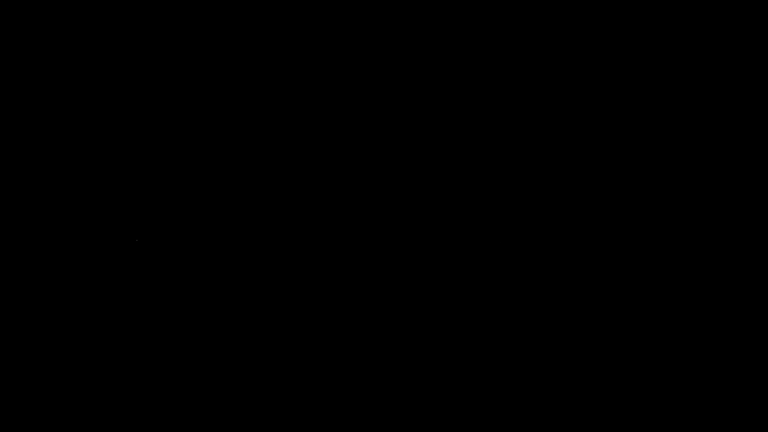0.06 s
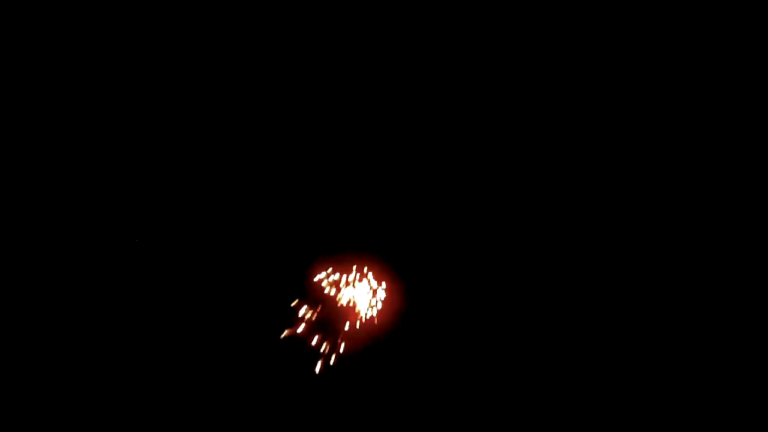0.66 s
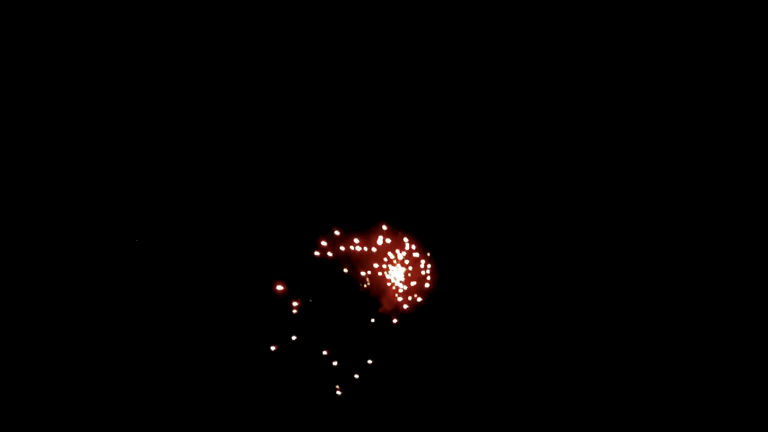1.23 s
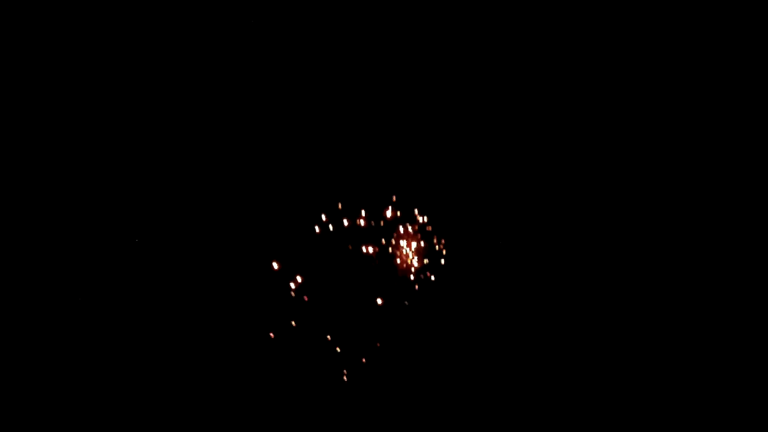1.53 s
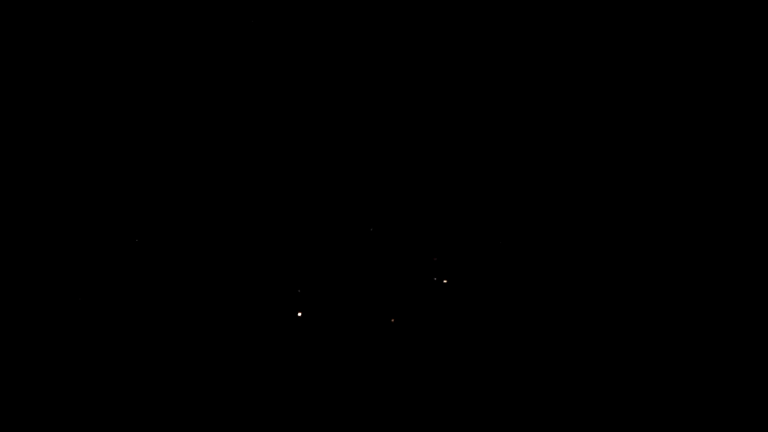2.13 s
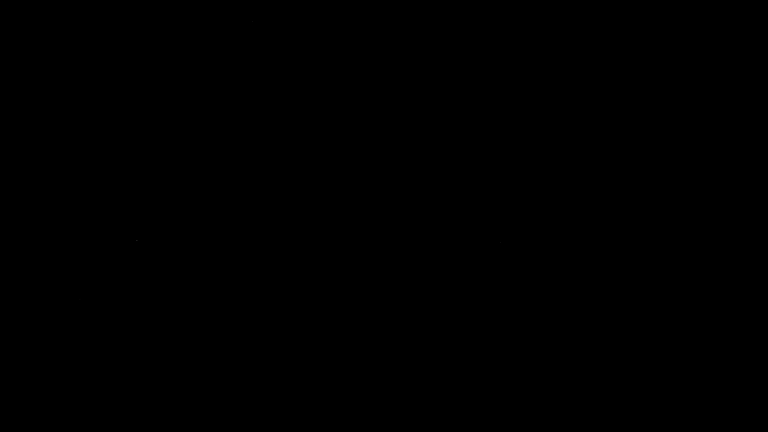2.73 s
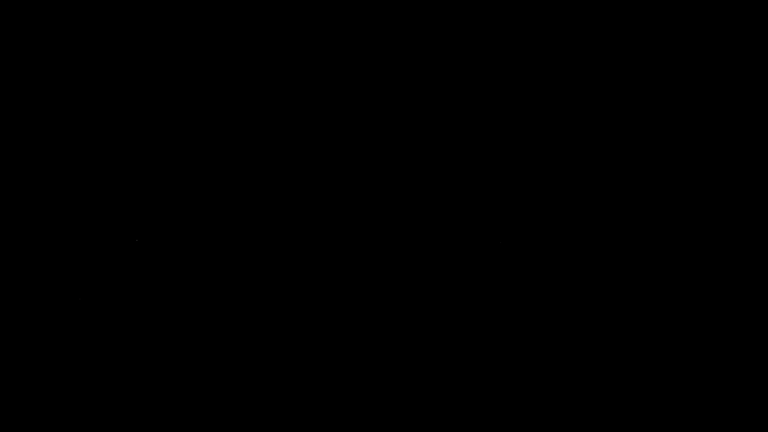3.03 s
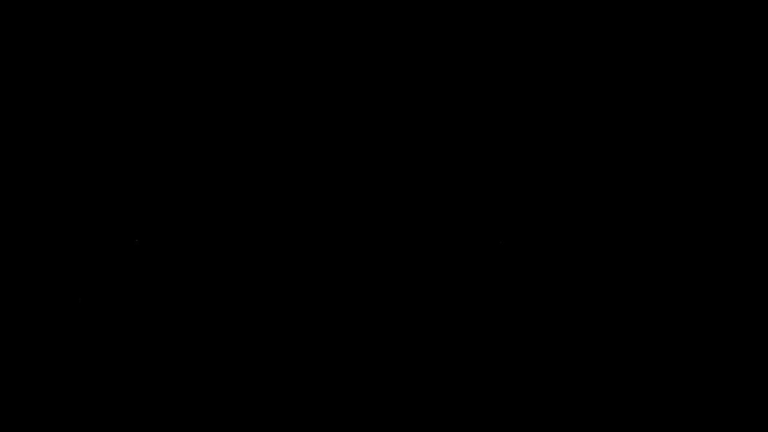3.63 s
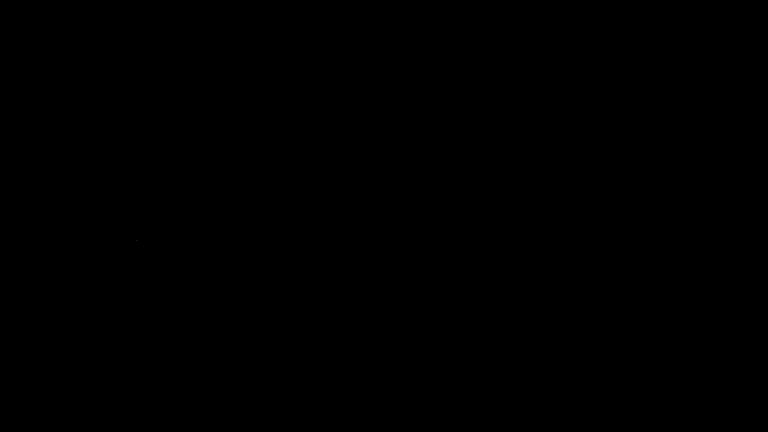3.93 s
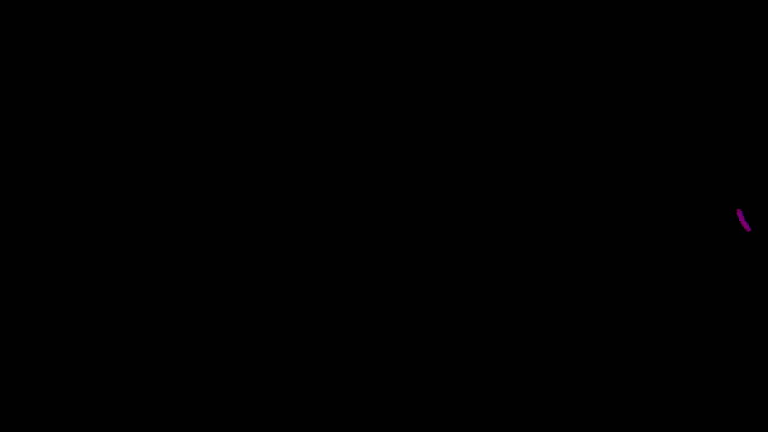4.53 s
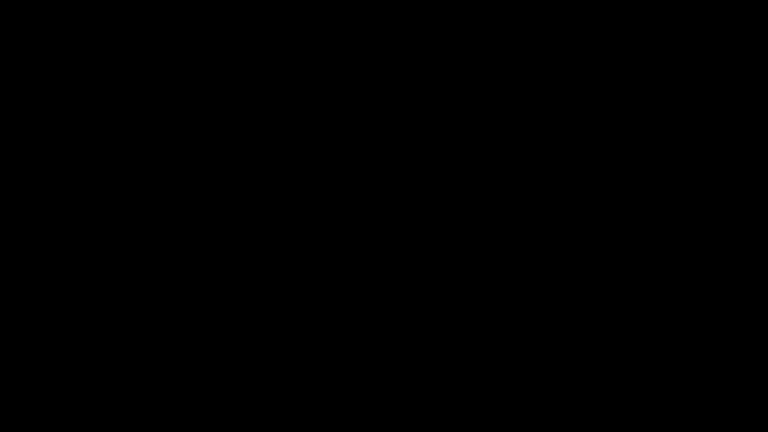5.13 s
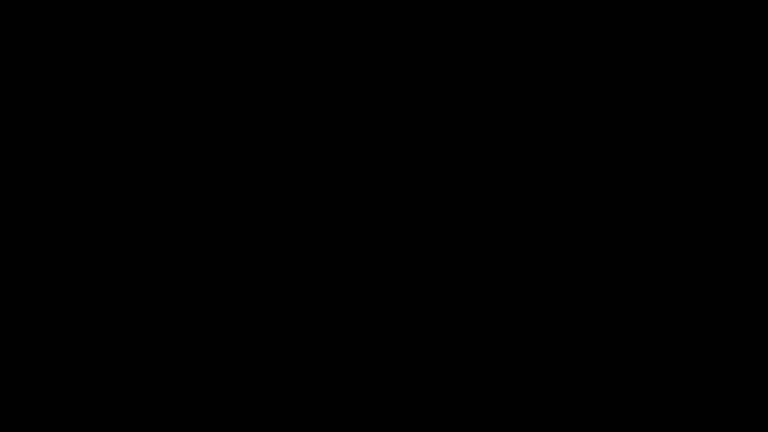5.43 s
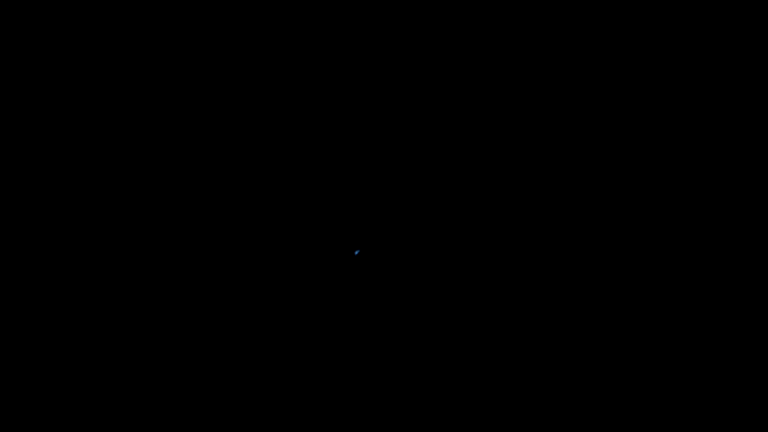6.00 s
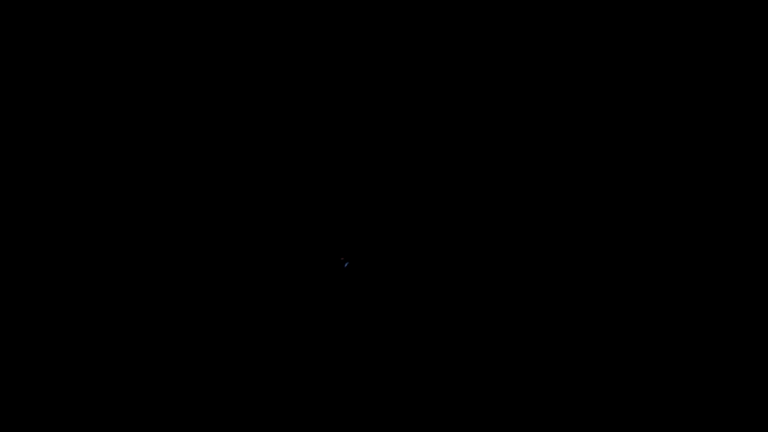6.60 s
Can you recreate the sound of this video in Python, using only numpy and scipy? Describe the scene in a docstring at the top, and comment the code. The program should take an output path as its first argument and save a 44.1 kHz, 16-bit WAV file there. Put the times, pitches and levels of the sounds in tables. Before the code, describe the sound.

A firework whooshes up, bursts with a loud bang, hisses and pops, followed by dry crackling and one sharp metallic clink.

```python
"""A firework shell whooshes upward at night and bursts with a double report. Its burning stars roar and
hiss, and pop as they burn out, with a few more heavy bangs among them. Bangs and pops are damped pressure
swings under a noise crack; the loudest overload a small microphone and make its gain control duck.
The sound cuts out for a moment; then come a dry crackle and one sharp clink of struck metal
over a faint outdoor rumble."""
import sys
import numpy as np
from scipy import signal
from scipy.fft import rfft, irfft, next_fast_len
from scipy.io import wavfile
from scipy.ndimage import uniform_filter1d, map_coordinates

SR = 44100
rng = np.random.default_rng(int(sys.argv[2]) if len(sys.argv) > 2 else 0)


def dump(signal):
    """Clip the signal to [-1, 1] and save it as 16-bit WAV at the path in sys.argv[1]."""
    limited = np.clip(np.atleast_2d(signal).T, -1, 1)
    pcm = np.round(limited * 32767).astype(np.int16)
    wavfile.write(sys.argv[1], SR, pcm)


N = 298116
TIME_S = np.arange(N) / SR
AGE_S = np.arange(SR // 2) / SR  # time within one short event
CUT_FROM_S, CUT_TO_S = 4.2981, 4.58


def amp(db):
    """Decibels to gain."""
    return 10 ** (np.asarray(db) / 20)


def fade(t60_s):
    """A decay of 60 dB in t60_s."""
    return amp(-60 * AGE_S / t60_s)


def wobble(rate_hz):
    """A smooth random curve, rate_hz knots a second."""
    knots = rng.standard_normal(int(N * rate_hz / SR) + 4)
    return map_coordinates(knots, [TIME_S * rate_hz])


def swell(start_s, rise_db_per_s, hold_s, fall_db_per_s):
    """Gain that climbs to 1 at start_s, holds, then falls."""
    before_s = np.maximum(start_s - TIME_S, 0)
    after_s = np.maximum(TIME_S - start_s - hold_s, 0)
    return amp(-rise_db_per_s * before_s - fall_db_per_s * after_s)


def noise(spectrum, size=N):
    """Noise of rms 1, coloured by (Hz, dB) points."""
    fft_size = next_fast_len(size)
    hz, db = np.transpose(spectrum)
    bins_hz = np.fft.rfftfreq(fft_size, 1 / SR)
    gain = amp(np.interp(np.log(bins_hz + 1), np.log(hz), db))
    coloured = irfft(rfft(rng.standard_normal(fft_size)) * gain, fft_size)[:size]
    return coloured / np.sqrt(np.mean(coloured ** 2) + 1e-20)


def burst(spectrum, hold_s, t60_s):
    """Coloured noise that holds, then dies away."""
    return noise(spectrum, len(AGE_S)) * amp(-60 * np.maximum(AGE_S - hold_s, 0) / t60_s)


def ring(hz, t60_s):
    """One damped resonance."""
    return np.sin(2 * np.pi * hz * AGE_S) * fade(t60_s)


def swing(hz, t60_s):
    """A damped resonance that builds up over its first cycle, so it carries little deep bass."""
    return ring(hz, t60_s) * (1 - np.exp(-2 * hz * AGE_S))


def add(track, start_s, sound):
    """Mix a sound into the track from start_s on."""
    part = track[round(start_s * SR):][:len(sound)]
    part += sound[:len(part)]


# Spectra of the night air. Each row: frequency in Hz, relative density in dB.
AIR_DRONE_SPECTRUM = [(20, -5), (45, -1.5), (80, -0.5), (140, -10.5), (400, -41)]
AIR_RUMBLE_SPECTRUM = [(60, -14.5), (110, -1), (170, 1), (300, -2.5), (450, -8), (620, -11), (900, -24),
                       (2000, -44.5)]
AIR_HISS_SPECTRUM = [(600, 0), (1000, -4.5), (1400, 1), (2500, -0.5), (3500, -9), (5000, -10.5),
                     (6000, -27.5), (7500, -12.5), (15000, -26.5)]
# Swell of the rumble. Each row: time in seconds, level in dB.
AIR_RUMBLE_LEVELS = [(4.6, -61.5), (5.55, -61.5), (5.72, -49.5), (6.0, -46.5), (6.42, -50.5), (6.55, -47),
                     (6.75, -49)]


def night_air():
    """After the dropout: a deep drone, a dull swelling rumble and a thin hiss."""
    rumble_db = np.interp(TIME_S, *np.transpose(AIR_RUMBLE_LEVELS))
    drone = amp(-59.5) * noise(AIR_DRONE_SPECTRUM)
    rumble = amp(rumble_db + 1.6 * wobble(14)) * noise(AIR_RUMBLE_SPECTRUM)
    hiss = amp(-61 + .7 * wobble(25)) * noise(AIR_HISS_SPECTRUM)
    return (drone + rumble + hiss) * (TIME_S > CUT_TO_S)


# Hiss peaking at 2 kHz. Each row: frequency in Hz, relative density in dB.
WHISTLE_SPECTRUM = [(1500, -28.5), (1850, -8.5), (2000, 1), (2250, -10.5), (2850, -8), (3500, -13.5),
                    (5000, -23), (6000, -40)]


def whistle():
    """A faint whistling hiss comes and goes as the last stars die."""
    envelope = swell(2.8, rise_db_per_s=76, hold_s=.38, fall_db_per_s=45)
    return amp(-65.5) * envelope * noise(WHISTLE_SPECTRUM)


# Dry ticks. Each row: start in seconds, level in dB, body offset in dB.
TICKS = [(4.583, -33, -7.5), (4.607, -35.5, -10.5), (4.633, -36, -15), (4.75, -23.5, -23),
         (4.776, -27.5, -13), (4.799, -25.5, -10), (4.85, -19.5, -10), (4.885, -30.5, -10),
         (4.918, -28.5, -12), (4.937, -30.5, -13), (4.977, -31, -16), (5.002, -31, -16), (5.034, -19, -35),
         (5.052, -29, -17), (5.079, -28.5, -19), (5.143, -18, -32), (5.179, -24.5, -22),
         (5.204, -28, -16.5), (5.257, -24, -19), (5.287, -28.5, -15.5), (5.374, -23, -16),
         (5.406, -29.5, -13), (5.474, -25, -17.5), (5.616, -26.5, -14)]
# The two parts of a tick. Each row: frequency in Hz, relative density in dB.
SCRATCH_SPECTRUM = [(300, -21), (800, 0.5), (1400, -3), (2200, -6.5), (3100, 9.5), (4000, -7.5),
                    (5000, -5.5), (6000, -24.5), (7200, -8.5), (10000, -13), (15000, -103)]
TICK_BODY_SPECTRUM = [(250, -28.5), (480, 1.5), (800, 5), (1300, -11), (2200, -21)]
# Sharp edge of grains, pops and bangs. Each row: frequency in Hz, relative density in dB.
CRACK_SPECTRUM = [(250, -31.5), (700, -3.5), (1200, -4.5), (1800, -4.5), (2300, -7.5), (2950, 3),
                  (4000, -13.5), (5000, -19), (6000, -28.5), (7500, -15), (9000, -18), (15000, -33.5)]


def crackle():
    """Dry, scratchy ticks, each with a small dull body and three weak grains scattered around it."""
    out = np.zeros(N)
    faint_ticks = [(rng.uniform(4.73, 5.11), rng.uniform(-39, -33), -11) for _ in range(12)]
    attack = 1 - fade(t60_s=.0025)
    for start_s, db, body_db in list(TICKS) + faint_ticks:
        scratch = amp(db - 10.5) * burst(SCRATCH_SPECTRUM, hold_s=.003, t60_s=.014)
        body = amp(db + body_db - 1.5) * burst(TICK_BODY_SPECTRUM, hold_s=.003, t60_s=.015)
        add(out, start_s, (scratch + body) * attack)
        for offset_s in rng.uniform(-.016, .011, size=3):
            grain = amp(db - 27) * burst(CRACK_SPECTRUM, hold_s=.00068, t60_s=.0062)
            add(out, start_s + offset_s, grain)
    return out


# Modes of the metal. Each row: frequency in Hz, relative level in dB, t60 in seconds.
METAL_MODES = [(1940, -12, 0.13), (2530, -2.5, .16), (2760, -10.5, .1), (2970, -4, 0.14), (3133, 3, 0.15),
               (4350, -20, .19), (4996, -24.5, 0.41), (5308, -30.5, 0.94), (5701, -21.5, 0.2),
               (5879, -35, .85), (6298, -19.5, 0.19), (6691, -33, .9), (7004, -21, 0.37),
               (7650, -23.5, .21)]
# The blow on it. Each row: frequency in Hz, relative density in dB.
STRIKE_SPECTRUM = [(100, -13.5), (400, -13.5), (750, -21.5), (1400, -6.5), (2000, -2.5), (2900, 3),
                   (4000, -10.5), (4700, -2.5), (6000, -24.5), (7500, -2.5), (10000, -30), (15000, -32.5)]


def clink():
    """A light touch, then a hard blow on metal: a bright strike, a dense clang and longer modes."""
    out = np.zeros(N)
    modes = sum(amp(db) * ring(hz, t60_s) for hz, db, t60_s in METAL_MODES)
    clang = amp(-32) * burst(STRIKE_SPECTRUM, hold_s=.0036, t60_s=.097)
    touch = amp(-33.5) * burst(STRIKE_SPECTRUM, hold_s=.00074, t60_s=.0083)
    strike = amp(-5.5) * burst(STRIKE_SPECTRUM, hold_s=.001567, t60_s=.0156)
    add(out, 5.5605, touch)
    add(out, 5.5649, strike + clang + amp(-28.5) * modes)
    return out


def blaze(rise_db, full_until_s, power):
    """Gain of the stars: they light, grow by rise_db to 1, then sink as a power of their age."""
    light_s, rise_s = .45, .3
    age_s = TIME_S - light_s
    growth = amp(-rise_db * np.clip(1 - age_s / rise_s, 0, 1))
    burn_down = np.maximum(age_s / full_until_s, 1) ** -power
    return (age_s > 0) * growth * burn_down


def climb(start_db, fade_db_per_s):
    """Gain of the climbing shell, fading as it flies off."""
    return amp(start_db - fade_db_per_s * TIME_S)


# Hiss and brighter fizz of the flame. Each row: frequency in Hz, relative density in dB.
HISS_SPECTRUM = [(400, -7), (900, -2), (1350, 0), (1700, -2.5), (2300, 2.5), (2900, 2), (3500, -5.5),
                 (4500, -20), (6000, -44)]
FIZZ_SPECTRUM = [(2500, -19), (3800, -2), (5000, -7.5), (6000, -23), (7200, -7.5), (9000, -8),
                 (11000, -18.5), (15000, -23)]
# Stars flaring up. Each row: start in seconds, hiss level in dB, hold in seconds.
FLARES = [(0.863, -30, 0.12), (1.146, -37, 0.064), (1.572, -43, 0.026), (1.70, -38, 0.026),
          (4.063, -47, 0.043), (4.133, -53, 0.13)]


def flame_hiss():
    """Shell and stars hiss and fizz; single stars flare, and a faint ember floor remains."""
    full_db, ember_hiss_db, ember_fizz_db = -25.5, -67.5, -68.5
    stars = amp(full_db) * blaze(rise_db=12.5, full_until_s=.39, power=2.81)
    flame = np.hypot(climb(-32.5, 40), stars)
    bright = amp(full_db - 6) * (flame / amp(full_db)) ** 1.4  # fizz swings wider than hiss
    flares = sum(amp(db) * swell(start_s, 450, hold_s, 550) for start_s, db, hold_s in FLARES)
    hiss_gain = np.hypot(np.hypot(flame, flares), amp(ember_hiss_db))
    fizz_gain = np.hypot(np.hypot(bright, amp(-8.5) * flares), amp(ember_fizz_db))
    return hiss_gain * noise(HISS_SPECTRUM) + fizz_gain * noise(FIZZ_SPECTRUM)


# Low and middle bands of the flame. Each row: frequency in Hz, relative density in dB.
RUMBLE_SPECTRUM = [(20, -5), (45, 4), (90, 2), (150, 2), (240, -4), (400, -16.5), (800, -40.5)]
ROAR_SPECTRUM = [(100, -28), (220, -13), (350, -3), (480, -0.5), (620, -1.5), (780, -10.5), (1000, -18),
                 (1300, -22), (1800, -31), (3000, -56)]


def rush():
    """The shell whooshes upward; then its burning stars rumble, roar and sputter."""
    star_rumble = amp(-48) * blaze(rise_db=7.5, full_until_s=.76, power=.8)
    star_roar = amp(-21) * blaze(rise_db=23, full_until_s=.56, power=1.94)
    flutter = wobble(35)
    sputter = amp(2.2 * flutter + 1.4 * wobble(400))  # fast unevenness of the flame
    rumble = np.hypot(climb(-34, 20), star_rumble) * amp(.72 * wobble(16)) * noise(RUMBLE_SPECTRUM)
    roar = np.hypot(climb(-33.5, 19), star_roar) * amp(.63 * flutter) * noise(ROAR_SPECTRUM)
    dip = amp(-10.5 * np.exp(-((TIME_S - .97) / .024) ** 2))  # brief, at the loudest pop
    return (rumble + roar + flame_hiss() * sputter) * dip * (TIME_S < CUT_FROM_S + .5)


# Single stars. Each row: start in seconds, thump level in dB, pitch in Hz, crack level in dB.
STAR_POPS = [(.831, -7, 604, -21), (.870, -11, 640, -14), (.894, -13, 615, -18), (.934, -16.5, 666, -8),
             (.964, -7.5, 685, -13), (.971, -6, 712, -6), (1.683, -25.5, 1140, -47),
             (1.8887, -7.5, 732, -22), (1.957, -27, 1250, -35), (2.362, -23.5, 458, -63),
             (2.389, -18.5, 468, -42), (3.378, -24, 600, -55), (3.646, -14, 594, -36.5),
             (3.777, -36.5, 696, -43.5), (3.821, -27, 886, -41), (3.8671, -25.5, 820, -44),
             (3.898, -30, 815, -37.5), (3.919, -10, 653, -25), (3.95, -27, 1200, -30),
             (4.000, -52, 690, -35.5), (4.067, -24.5, 686, -29), (4.114, -27.5, 520, -52),
             (4.277, -25.5, 500, -52)]


def pops():
    """Single stars snap: a crack over a brief thump with one overtone and a puff of the roar."""
    out = np.zeros(N)
    for start_s, thump_db, hz, crack_db in STAR_POPS:
        thump = swing(hz, t60_s=.025) + amp(-4.5) * swing(1.4 * hz, t60_s=.017)
        puff = amp(-15) * burst(ROAR_SPECTRUM, hold_s=.0012, t60_s=.052)
        crack = burst(CRACK_SPECTRUM, hold_s=.0023, t60_s=.0076)
        add(out, start_s, amp(thump_db) * (thump + puff) + amp(crack_db) * crack)
    return out


def echo():
    """The double report comes back once as a dull smear of noise."""
    out = np.zeros(N)
    report_s, delay_s = REPORTS[0][0], .052
    add(out, report_s + delay_s, amp(-25.5) * burst(ROAR_SPECTRUM, hold_s=.021, t60_s=.15))
    return out


# Heavy reports. Each row: start in seconds, blast level in dB, pitch in Hz, overtone in Hz,
# overtone level in dB re the blast, blast t60 in seconds, crack level in dB, crack t60 in seconds.
REPORTS = [(0.4641, 16.5, 494, 1134, -15.5, 0.015, 5, 0.015),
           (0.4745, 23, 533, 1130, -16.5, 0.0059, 6.5, 0.0068), (1.1750, 26, 677, 1007, -2, .02, 18, 0.017),
           (3.731, 12, 594, 1168, -7, 0.015, 11, 0.0085), (3.9620, 15, 553, 1095, -36, 0.013, -2.5, 0.014)]


def bangs():
    """Each report is a few heavy pressure swings in two resonances under a sharp crack."""
    out = np.zeros(N)
    for start_s, blast_db, hz, overtone_hz, overtone_db, blast_t60_s, crack_db, crack_t60_s in REPORTS:
        blast = swing(hz, blast_t60_s) + amp(overtone_db) * swing(overtone_hz, blast_t60_s)
        crack = burst(CRACK_SPECTRUM, hold_s=.00023, t60_s=crack_t60_s)
        add(out, start_s, amp(blast_db) * blast + amp(crack_db) * crack)
    add(out, REPORTS[-1][0], amp(-36) * ring(hz=637, t60_s=.79))  # the last leaves a hollow tone
    return out


def scene():
    """All sources reach both channels alike."""
    burning = rush() * (TIME_S < CUT_TO_S)  # gone when the sound returns
    sound = burning + whistle() + bangs() + echo() + pops() + crackle() + clink() + night_air()
    return np.array([sound, sound])


def gain_control(x, threshold_db, recovery_db_per_s, lag_s):
    """Overloads pull the gain down a moment later; it climbs back at a steady rate."""
    power = np.abs(uniform_filter1d(x[0] ** 2, size=256))
    excess_db = np.maximum(10 * np.log10(power + 1e-12) - threshold_db, 0)
    recovery_db = recovery_db_per_s * TIME_S
    duck_db = np.maximum.accumulate(excess_db + recovery_db) - recovery_db
    return x * amp(-np.interp(TIME_S - lag_s, TIME_S, duck_db))


def clock_jitter(x, clock_hz, depth_samples):
    """Periodic timing jitter mirrors the sound about the clock tone, adding a glassy treble."""
    positions = np.arange(N) + depth_samples * np.cos(2 * np.pi * clock_hz * TIME_S)
    return np.array([map_coordinates(channel, [positions], mode="nearest") for channel in x])


def dropout(x):
    """The signal cuts out and returns; the click at the cut is a little longer on the left."""
    out = x * ((TIME_S < CUT_FROM_S) | (TIME_S > CUT_TO_S))
    for channel, click_s in zip(out, (.0016, .00095)):
        add(channel, CUT_FROM_S, -fade(t60_s=.022) * (AGE_S < click_s))
    return out


def record(dry):
    """A small recorder: lagging gain control, hard clipping, clock jitter, a dropout, a band limit."""
    ducked = gain_control(dry, threshold_db=-4, recovery_db_per_s=205, lag_s=.008)
    clipped = np.clip(ducked, -1, 1)
    jittered = clock_jitter(clipped, clock_hz=12000, depth_samples=1.306)
    top_hz = 15600
    lowpass = signal.cheby1(10, .1, top_hz, fs=SR, output="sos")
    return np.clip(signal.sosfiltfilt(lowpass, dropout(jittered)), -1, 1)


dry = scene()
out = record(dry)
dump(out)
```